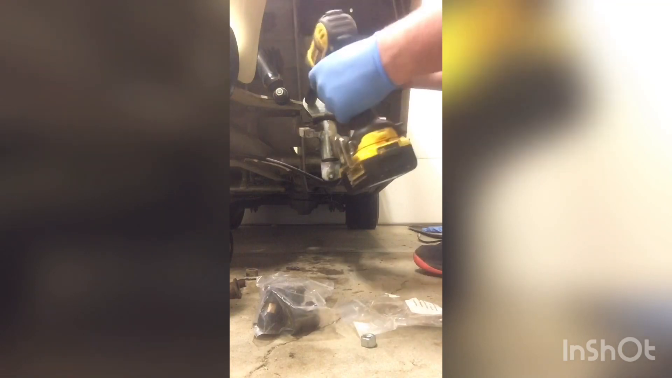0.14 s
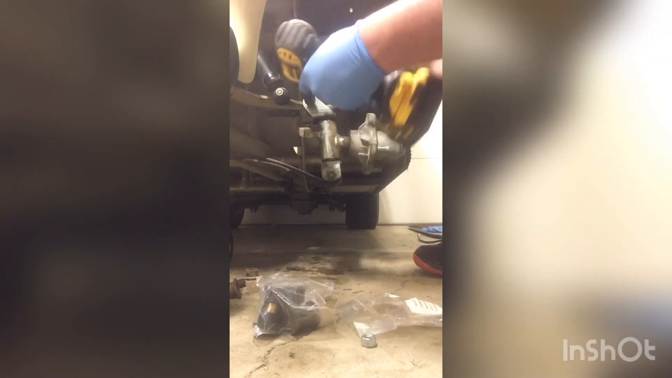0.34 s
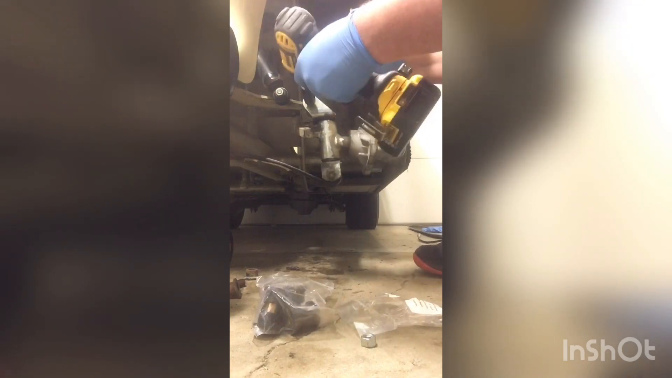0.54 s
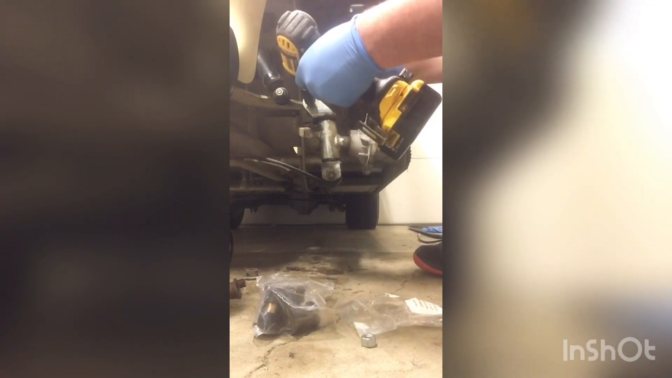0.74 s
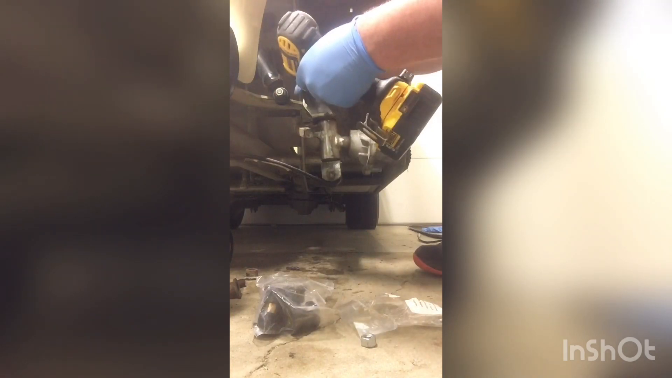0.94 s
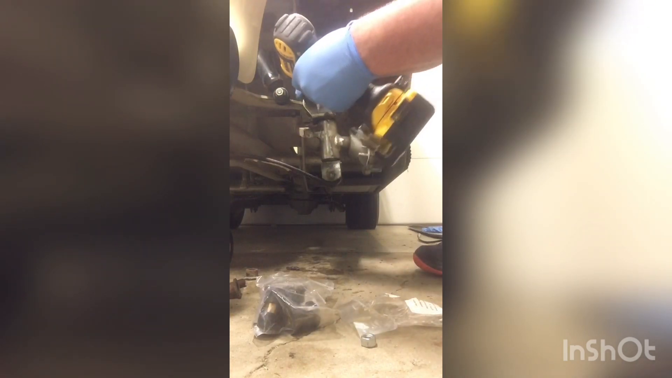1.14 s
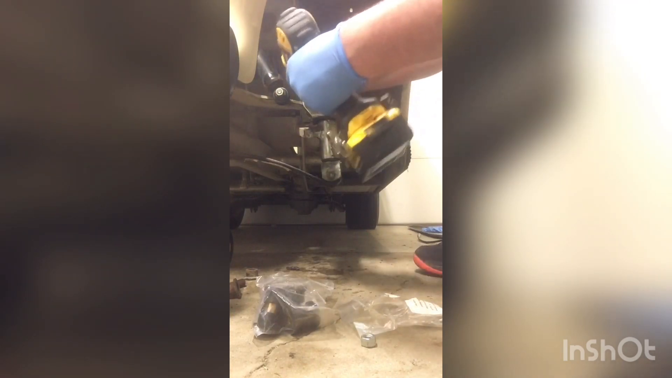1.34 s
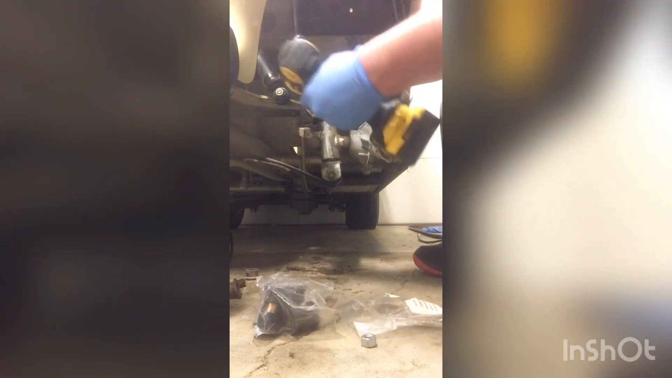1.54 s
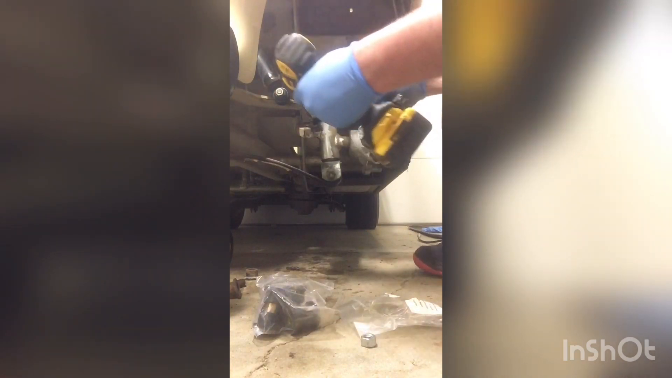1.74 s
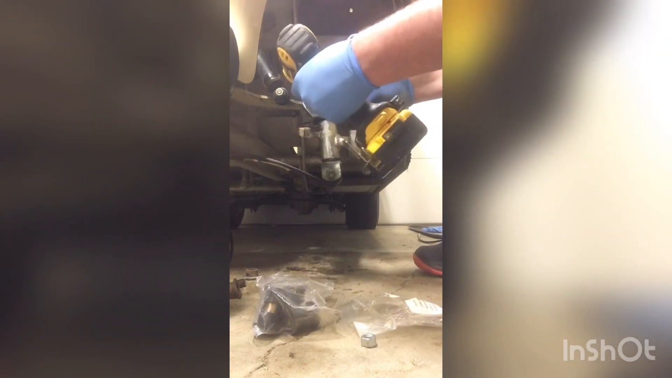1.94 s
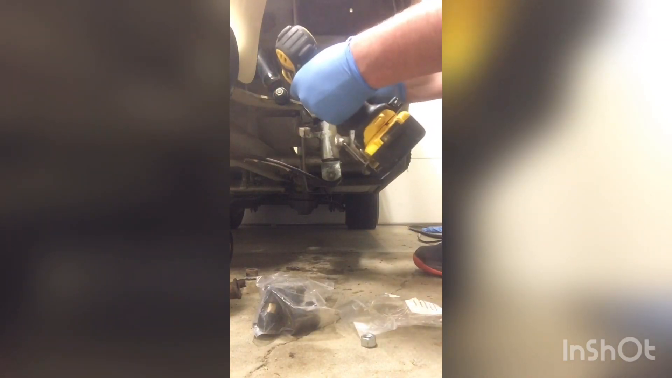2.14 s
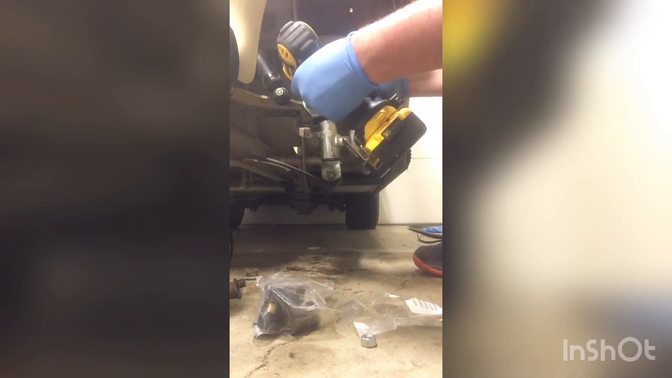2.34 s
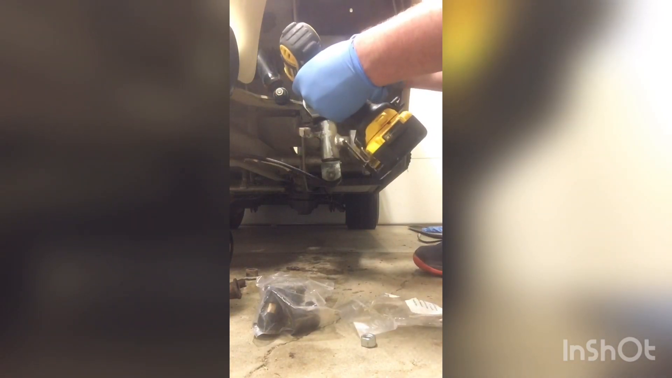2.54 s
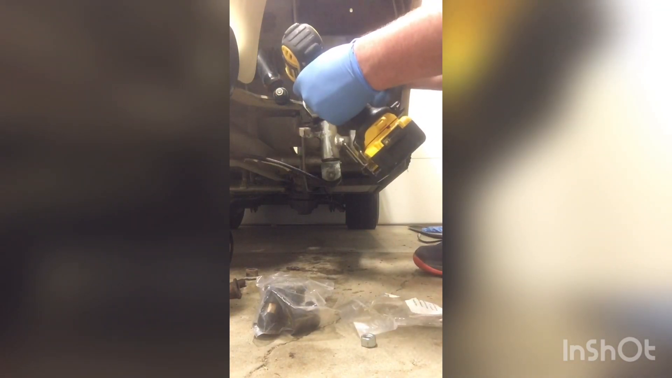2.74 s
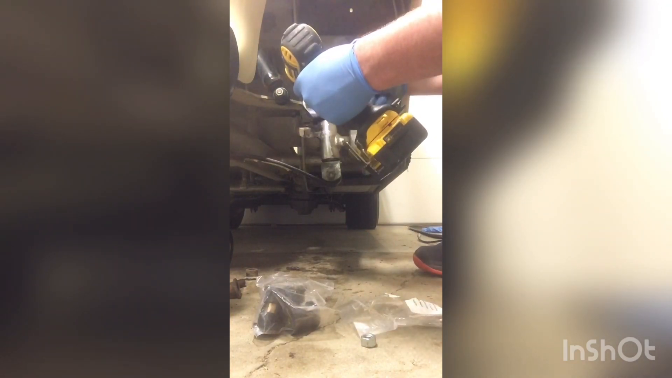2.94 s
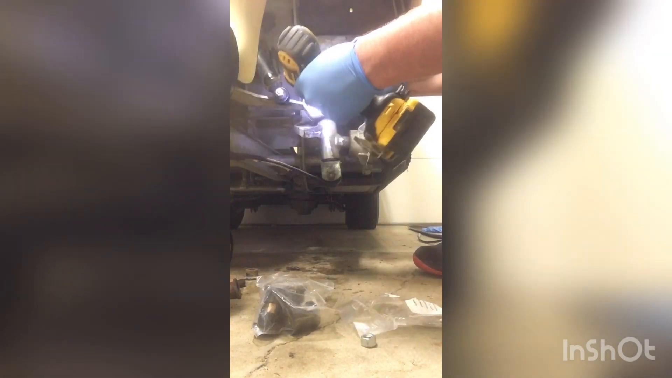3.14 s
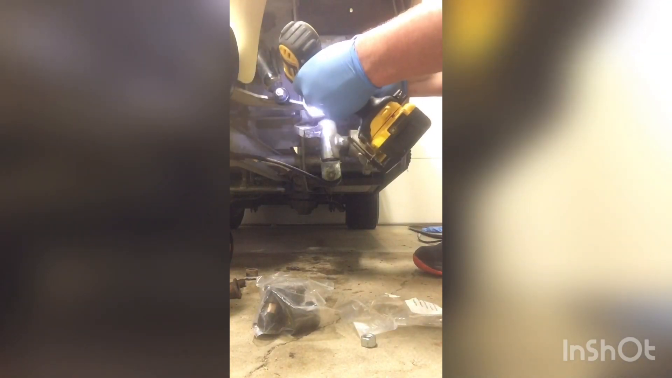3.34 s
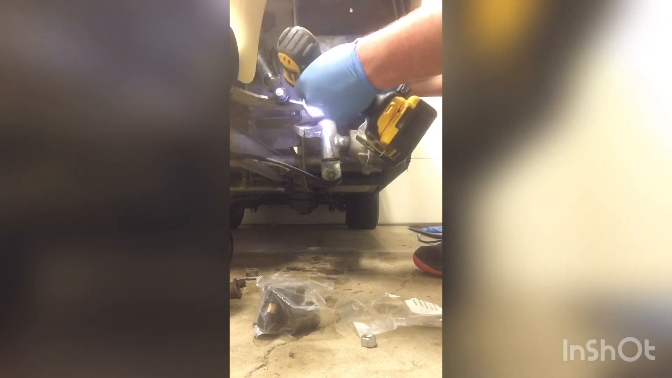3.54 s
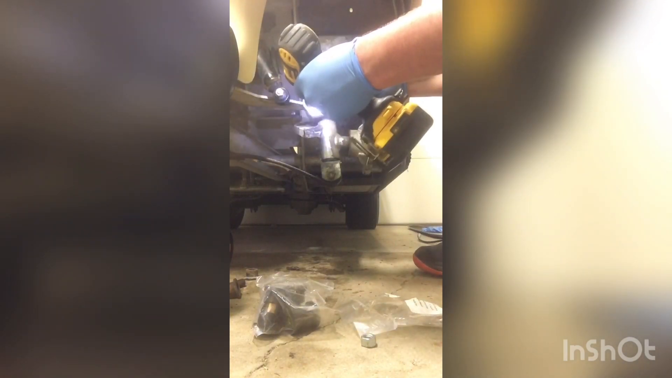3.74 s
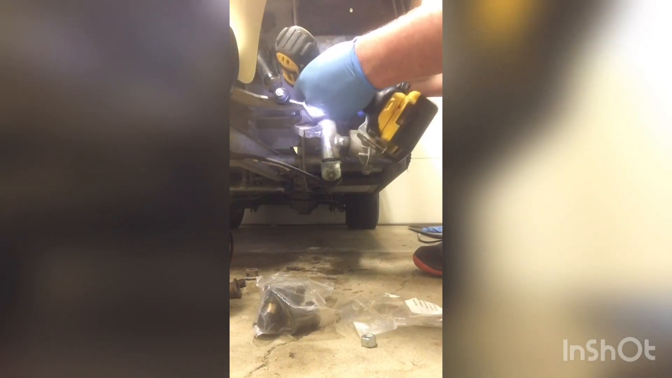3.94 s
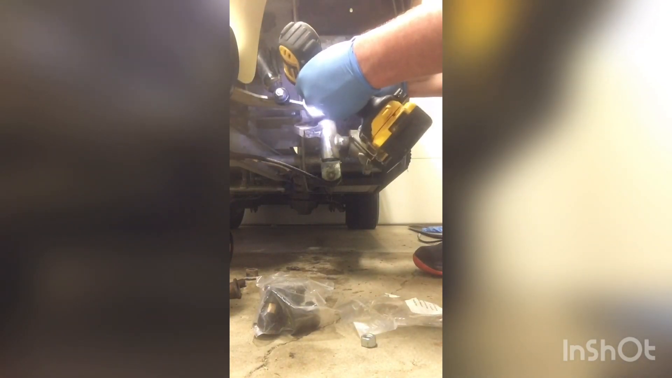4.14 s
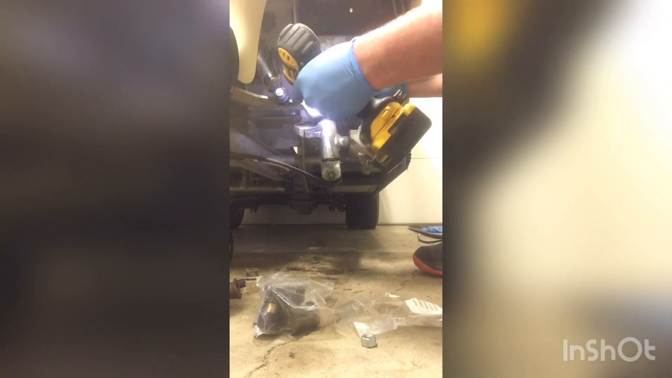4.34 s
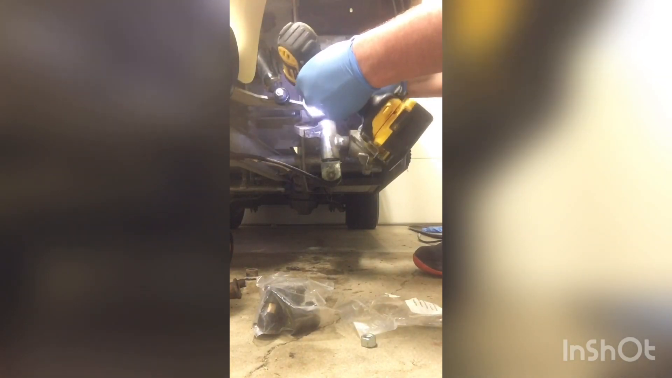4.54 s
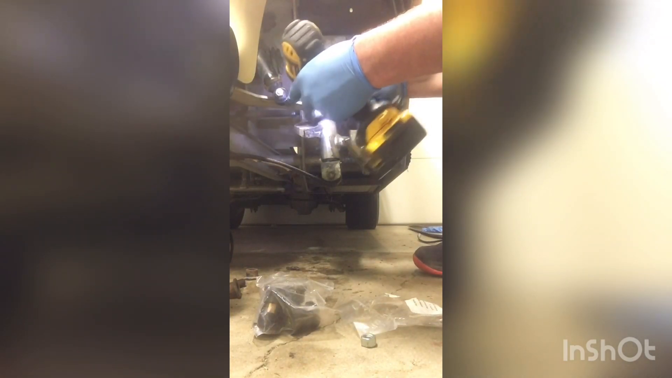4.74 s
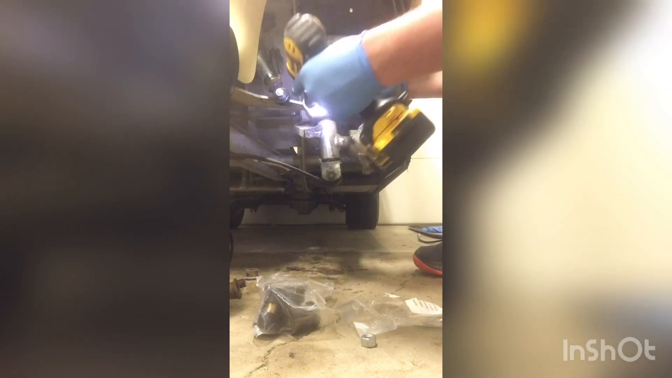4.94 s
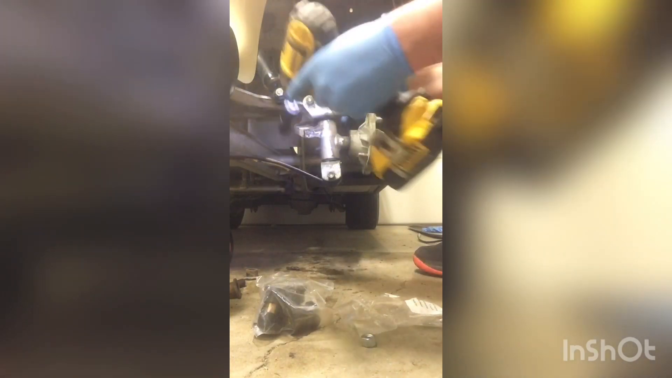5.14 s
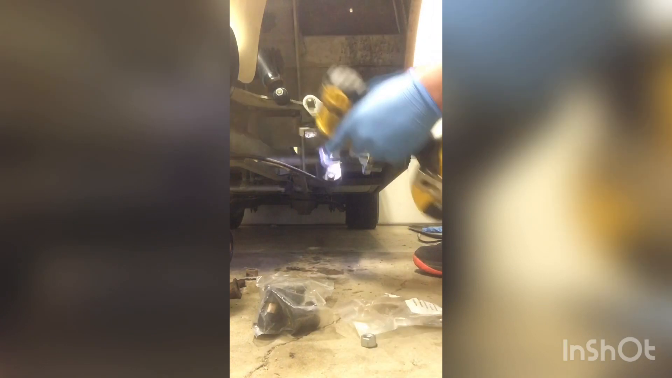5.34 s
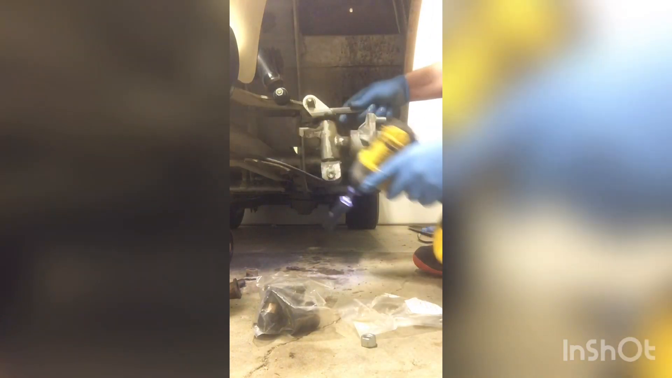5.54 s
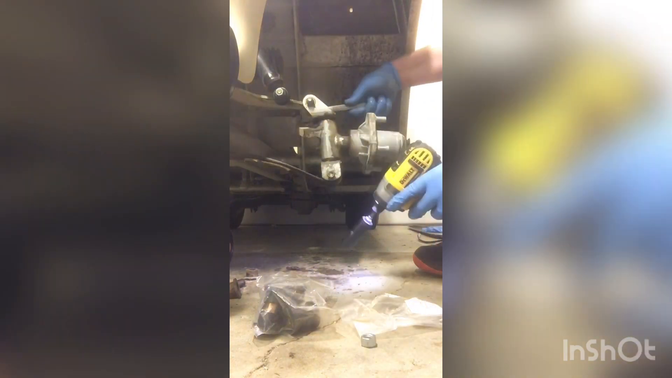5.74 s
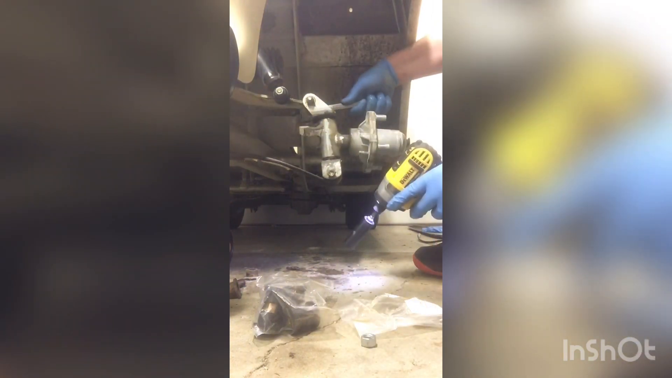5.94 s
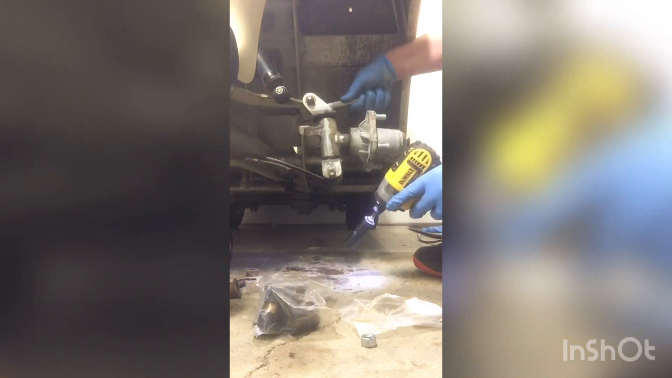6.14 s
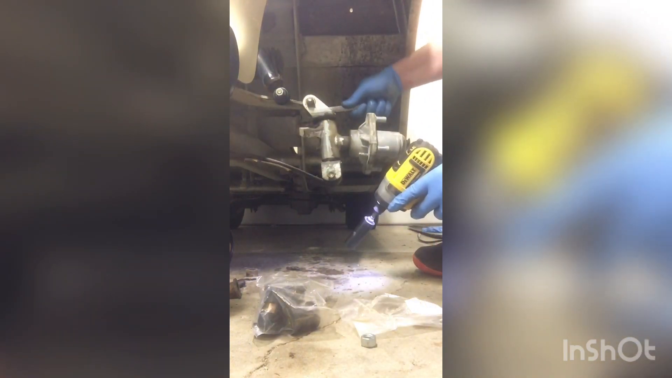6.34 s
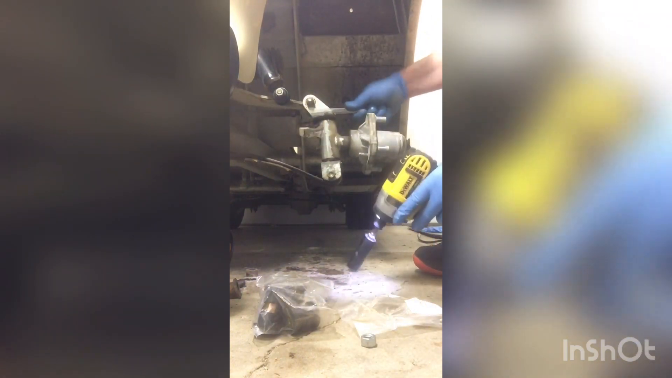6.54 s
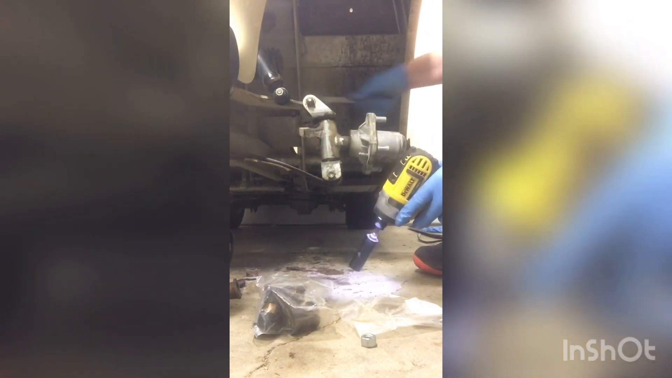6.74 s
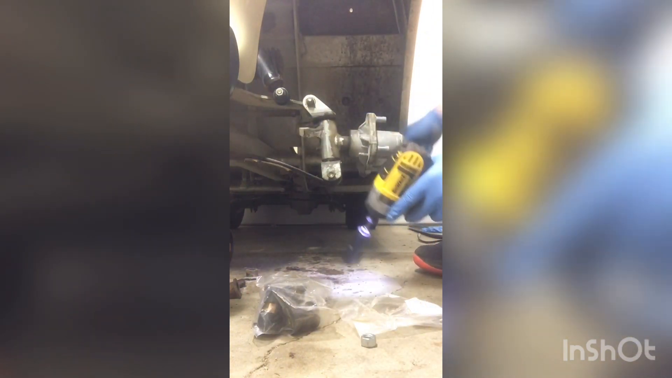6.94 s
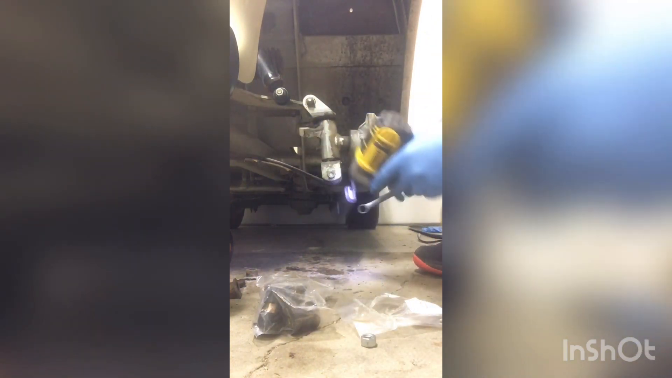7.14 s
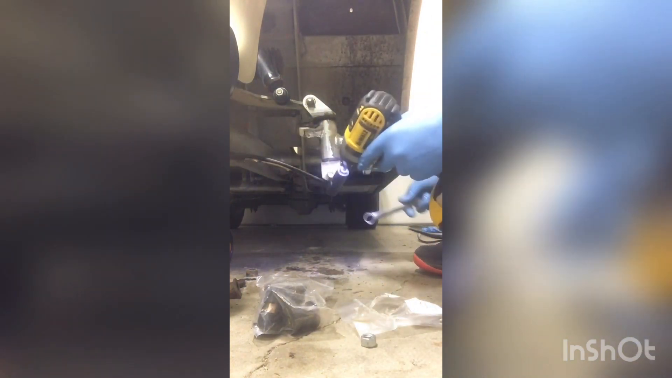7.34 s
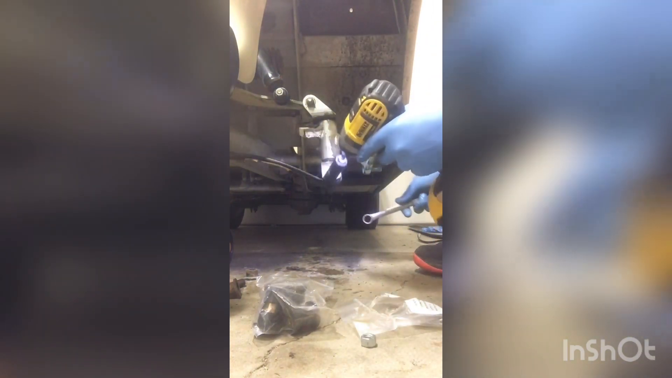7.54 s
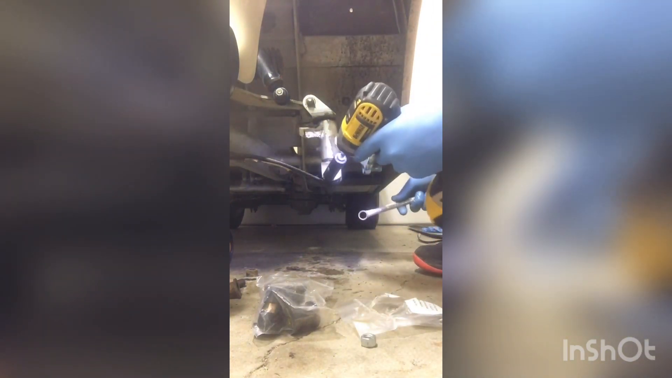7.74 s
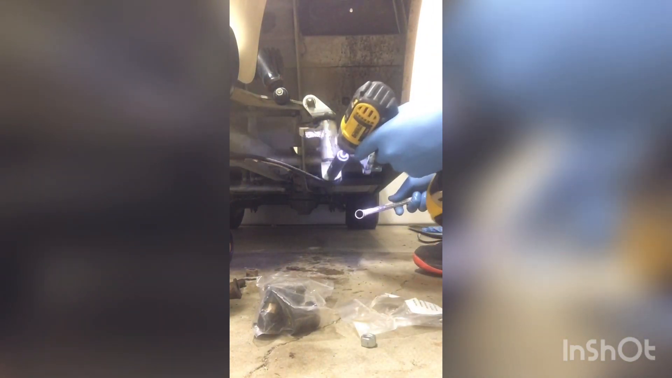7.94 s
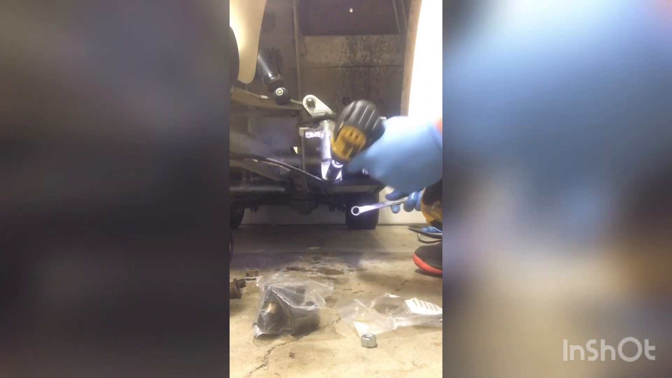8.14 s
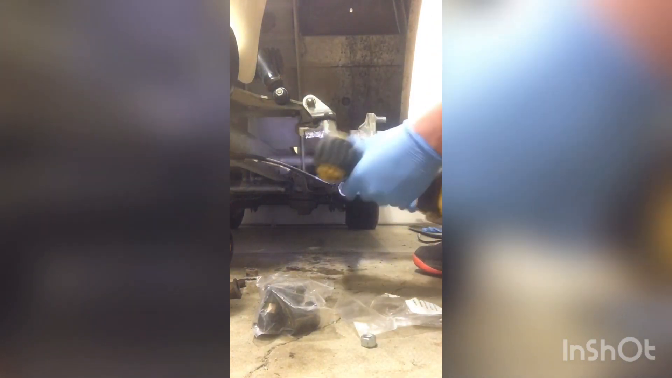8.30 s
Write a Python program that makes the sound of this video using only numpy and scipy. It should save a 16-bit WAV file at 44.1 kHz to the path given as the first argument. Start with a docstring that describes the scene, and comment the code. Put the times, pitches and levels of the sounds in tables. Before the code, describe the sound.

Metal tools clink on steel, then an impact driver whirs and fires five harsh, rapid hammering bursts; sparse clinks and glove rustle follow.

```python
"""Concrete garage: a cordless impact driver tightens a nut on a steel trailer coupling in five short bursts.
Blows are noise bursts through steel resonances; gears rattle as grainy noise, with a rough whine at first.
Mostly before and after, socket and wrench clink on the steel and ring; gloves and sleeves rustle.
Garage echo, mains hum and a faint hiss lie around the work; the microphone input rounds off the peaks."""
import sys
import numpy as np
from scipy import signal
from scipy.fft import rfft, irfft, next_fast_len
from scipy.io import wavfile
from scipy.ndimage import map_coordinates

SR = 44100
rng = np.random.default_rng(int(sys.argv[2]) if len(sys.argv) > 2 else 0)


def to_wav(s):
    """Save 16-bit WAV."""
    ch = np.atleast_2d(s).T  # columns
    pcm = np.round(np.clip(ch, -1, 1) * 32767)  # PCM
    wavfile.write(sys.argv[1], SR, pcm.astype(np.int16))


N = 373515

# trigger pulls: trigger_s, kick_db, slack_s, first_blow_s, first_gap_ms, running_gap_ms,
# settle (share of the extra gap left at each next blow), last_gap_ms, blow_db, motor_db, coast_s
TRIGGER_PULLS = [(2.9819, -12, 3.0035, 3.0864, 26.5, 19.5, .8, 22.2, 0.25, -18, .012),
                 (3.4533, -18, 3.48, 3.4880, 21.7, 16.4, .35, 20, 1.08, -16.5, .012),
                 (3.8243, -20, 3.8502, 3.8570, 20, 17.4, .2, 23, -0.5, -17, .03),
                 (4.1548, -21, 4.1798, 4.1872, 20, 17.6, .35, 16, -0.5, -17.5, .008),
                 (4.527, -8.5, 4.5404, 4.5534, 15.9, 18.9, .3, 12, -0.66, -15.5, .08)]
# blows in each pull: count
BLOW_COUNTS = (7, 10, 8, 6, 6)


def amp(db):
    """Gain of a level in dB."""
    return 10 ** (np.asarray(db) / 20)


def unit(x):
    """x at rms 1."""
    return x / np.sqrt(np.mean(x ** 2) + 1e-20)


def along(points, hz):
    """Values of (Hz, value) points, interpolated on a log frequency axis."""
    point_hz, values = np.transpose(points)
    return np.interp(np.log(hz + 1), np.log(point_hz + 1), values)


def level(tables):
    """Gain per sample summed over (s, dB) envelopes, silent outside each."""
    t = np.arange(N) / SR
    return sum(amp(np.interp(t, *np.transpose(rows), left=-200, right=-200)) for rows in tables)


def filtered(x, response):
    """x times a complex response of frequency, along the last axis."""
    m = next_fast_len(x.shape[-1] + SR // 4)
    spectrum = rfft(x, m) * response(np.fft.rfftfreq(m, 1 / SR))
    return irfft(spectrum, m)[..., :x.shape[-1]]


def unit_power(response):
    """A response that keeps the rms of white noise."""
    return response / np.sqrt(np.mean(abs(response) ** 2, axis=-1, keepdims=True))


def peak(f, centre_hz, width_hz):
    """Causal bandpass response of one damped resonance."""
    return 1j * f * width_hz / (centre_hz ** 2 - f * f + 1j * f * width_hz)


def body(modes):
    """Response of (centre_hz, width_hz, db) resonances of alternating sign, at mean power 1."""
    return lambda f: unit_power(sum((-1) ** k * amp(db) * peak(f, centre_hz, width_hz)
                                    for k, (centre_hz, width_hz, db) in enumerate(modes)))


def placed(s, rows):
    """Rows of sound added at their times."""
    at = np.round(s * SR).astype(int)[:, None] + np.arange(rows.shape[1])
    return np.bincount(at.ravel(), rows.ravel(), N + SR)[:N]


def bursts(s, db, t60, rise=0.00046, snap_db=-40):
    """Dying noise from each contact: a snap, then chatter that builds up more slowly in heavy parts."""
    t = np.arange(SR // 5) / SR
    chatter = amp(-60 * t / np.clip(t60, .004, .2)[:, None]) * (1 - np.exp(-t / rise))
    snap = amp(snap_db - 60 * t / 0.0087)
    noise = rng.standard_normal((len(s), len(t)))
    return placed(s, noise * amp(db)[:, None] * (chatter + snap))


def sputter(rate_hz, depth_db):
    """Grainy noise: a smooth curve through rate_hz random levels a second sets its gain."""
    points = rng.standard_normal(int(N * rate_hz / SR) + 4)
    jumps = map_coordinates(points, [np.arange(N) * rate_hz / SR])
    return unit(amp(depth_db * jumps) * rng.standard_normal(N))


def blow_times(pull, count):
    """The hammer settles from first to running gap; its pace changes as the trigger is let go."""
    first_s, gap_ms, run_ms, settle, last_ms = pull[3:8]
    running_ms = run_ms + (gap_ms - run_ms) * settle ** np.arange(count - 2)
    gaps_ms = np.append(running_ms, last_ms)
    return first_s + np.append(0, np.cumsum(gaps_ms)) / 1000


def strikes():
    """Trigger kick, slack taken up, blows, coasting rattle: rows s, level_db, treble_db, t60_s, scattered."""
    kick_treble_db, blow_treble_db, loose_treble_db = -24.5, -15, -21
    kick_t60_s, blow_t60_s, rattle_t60_s = 0.0092, 0.056, 0.036
    take_up_db, late_db_per_ms = -1.5, 1.05  # against a full blow; a late last blow is weaker
    rattle_gap_s, rattle_db, rattle_fade_db_per_s = .0085, -5, 91
    rows = []
    for pull, count in zip(TRIGGER_PULLS, BLOW_COUNTS):
        on_s, kick_db, slack_s, _, _, run_ms, _, last_ms, db, _, coast_s = pull
        blows_s = blow_times(pull, count)
        end_s = blows_s[-1]
        last_db = db - late_db_per_ms * max(last_ms - run_ms, 0)
        rows.append((on_s, kick_db, kick_treble_db, kick_t60_s))
        rows.append((slack_s, db + take_up_db, loose_treble_db, blow_t60_s))
        rows += [(at_s, db, blow_treble_db, blow_t60_s) for at_s in blows_s[:-1]]
        rows.append((end_s, last_db, loose_treble_db, blow_t60_s))
        # loose hammer while the motor coasts
        for after_s in np.arange(3 * rattle_gap_s, coast_s + .01, rattle_gap_s):
            fading_db = db + rattle_db - rattle_fade_db_per_s * after_s
            rows.append((end_s + after_s, fading_db, loose_treble_db, rattle_t60_s))
    s, db, treble_db, t60 = np.transpose(rows)
    chance = rng.standard_normal((80, 4))[:len(s)].T
    return (s + .0004 * chance[0], db + 1.5 * chance[1],
            treble_db + 3 * chance[2], t60 * amp(1.8 * chance[3]))


def hammer():
    """Each blow and its rebound shake the housing; the anvil cracks, coupling and chassis follow."""
    s, db, treble_db, t60 = strikes()
    rebound = bursts(s + 0.0051, db - 15.5, .5 * t60, rise=0.00051)
    housing = bursts(s, db - 9.5, 0.91 * t60, snap_db=-1.5) + rebound
    anvil = bursts(s, db + treble_db - 6.5, 1.4 * t60, snap_db=2.0)
    coupling = bursts(s, db - 15, 1.564 * t60, rise=.006)
    chassis = bursts(s, db - 27, 0.76 * t60, rise=0.0065)
    return np.array([housing, anvil, coupling, chassis])


def motor():
    """One (s, dB) envelope a pull: spin up, run free, labour under the blows, coast, stop."""
    start_db, free_db, coast_db, coast_end_db, stop_db = -14, -5, -11, -15, -32  # against motor_db
    spin_up_s, load_s, let_go_s, stop_s = .015, 0.0089, .018, .035
    tables = []
    for pull, count in zip(TRIGGER_PULLS, BLOW_COUNTS):
        on_s, (db, coast_s) = pull[0], pull[-2:]
        first_s, *_, off_s = blow_times(pull, count)
        spun_s = min(on_s + spin_up_s, first_s - load_s - .001)
        coasting_s = off_s + let_go_s
        tables.append([(on_s, db + start_db), (spun_s, db + free_db - 3.0),
                       (first_s - load_s, db + free_db), (first_s, db), (off_s, db - 2.0),
                       (coasting_s, db + coast_db), (coasting_s + coast_s, db + coast_end_db),
                       (coasting_s + coast_s + stop_s, db + stop_db)])
    return tables


def gears():
    """Gear teeth rattle in the housing, and weakly in the rest of the steel."""
    teeth = sputter(400, depth_db=3)
    return level(motor()) * teeth * amp([[0.1], [-17], [-10], [-22]])  # housing, anvil, coupling, chassis


def whine():
    """In the first pull the unloaded tooth mesh whines roughly and climbs, until the first blow."""
    # harmonics of the mesh: multiple, level_db
    mesh_orders = [(1, -11.5), (2, -0.5), (3, -4), (4, -7.5)]
    start_hz, top_hz, climb_s = 520, 1920, .045
    mesh_db, rise_s, fall_s, rough_rad = -21.5, .036, 0.0097, .33
    on_s, load_s = TRIGGER_PULLS[0][0], TRIGGER_PULLS[0][3]

    def wander():
        """Smooth random curve through a new value every 140 samples."""
        return map_coordinates(rng.standard_normal(N // 100), [np.arange(N) / 140])

    since_s = np.clip(np.arange(N) / SR - on_s, 0, None)
    hz = top_hz - (top_hz - start_hz) * np.exp(-since_s / climb_s)
    phase = 2 * np.pi * np.cumsum(hz) / SR + rough_rad * wander()
    swell = [(on_s, mesh_db - 30.5), (on_s + rise_s, mesh_db),
             (load_s - fall_s, mesh_db), (load_s, mesh_db - 29.5)]
    tones = sum(amp(order_db + 5.5 * wander()) * np.sin(k * phase) for k, order_db in mesh_orders)
    return level([swell]) * tones


def steelwork(shakes):
    """Shakes of housing, anvil, coupling and chassis, each heard through its own resonances."""
    # driver housing: centre_hz, width_hz, level_db
    housing_modes = [(1800, 1000, -7.5), (2540, 470, 1), (2985, 300, 2.5), (3360, 450, 0), (4174, 390, 3),
                     (4593, 360, 3), (5080, 590, -3.5), (6094, 910, -9)]
    # anvil: centre_hz, width_hz, level_db
    anvil_modes = [(7066, 870, 1), (8570, 1600, -6), (9550, 890, -7.5), (11230, 640, -7.5),
                   (13900, 5800, -9.5)]
    # trailer coupling: centre_hz, width_hz, level_db
    coupling_modes = [(294, 170, -3.5), (410, 98, 2), (582, 170, -0.5), (812, 60, 5), (998, 71, 2),
                      (1202.5, 75, 5), (1490, 460, -6)]
    # trailer chassis: centre_hz, width_hz, level_db
    chassis_modes = [(81, 30, 0.5), (125, 46, 1), (220.6, 42, -3.5)]
    parts = (housing_modes, anvil_modes, coupling_modes, chassis_modes)
    return filtered(shakes, lambda f: np.array([body(modes)(f) for modes in parts])).sum(axis=0)


def swishes(t):
    """Gain of the moving hands: each swish swells and fades, 6 dB down at its ends."""
    # glove and sleeve swishes: middle_s, length_s, level_db
    swish_rows = [(0, .24, -55.5), (.29, .09, -58), (.6, .17, -56.5), (.745, .07, -60), (.85, .2, -65),
                  (1.24, .14, -53), (1.4, .1, -56.5), (1.468, .022, -40), (1.95, .3, -61),
                  (2.55, .45, -61.5), (2.95, .08, -61), (5.08, .15, -54.5), (5.33, .45, -59),
                  (5.68, .3, -64), (6.36, .06, -66.5), (6.46, .2, -66), (7.77, .07, -61), (8.1, .1, -51),
                  (8.29, .2, -51), (8.47, .12, -65)]
    return sum(amp(db - 24 * ((t - s) / length_s) ** 2) for s, length_s, db in swish_rows)


def contacts():
    """The listed clinks, and faint ones at random where the hands move."""
    # socket, wrench and tool on steel:
    # start_s, level_db, pitch_hz, treble_db, knock_hz, knock_db, thud_db
    clink_rows = [(0.0802, -42, 2080, -32, 334, -8.5, -6), (0.115, -45.5, 2740, -27, 810, 3, -0.5),
                  (0.377, -44, 2430, -35, 920, 1, -21), (0.4344, -46.5, 2760, -31, 870, -15, -33),
                  (0.9042, -9, 4230, -20, 1470, -31.5, -58), (0.9115, -16, 2450, -28, 1500, -30, -55),
                  (1.1418, -43, 3030, -29, 813, -12, -32), (1.2437, -33.5, 3150, -41, 864, -8, -19),
                  (1.256, -35.5, 2040, -33, 423, -4.5, -10), (1.4154, -45, 2050, -28, 1120, -8, -22),
                  (1.4746, -7, 2460, -17.5, 1270, -14.5, -20), (1.5044, -21.5, 2010, -37, 560, -9.5, -7),
                  (1.923, -12.5, 4340, -31, 790, -18, -37), (2.243, -46.5, 4340, -9, 305, -34, -18.5),
                  (2.2692, -46, 3370, -25, 770, -15, -22), (2.3397, -41.5, 2110, -33, 802, -13, -23),
                  (2.4168, -23, 3210, -24.5, 598, -11.5, -31),
                  (2.4852, -12.5, 3300, -14.5, 813, -15.5, -36), (2.9287, -39, 3023, -19.5, 310, -38, -23),
                  (3.0192, -10, 5000, -22, 900, -21, -36), (3.2192, -5.5, 4300, -30, 900, -20, -21),
                  (5.0837, -41.5, 4527, -27, 949.3, -3, -17), (5.169, -31.5, 2940, -35.5, 780, -2, -26),
                  (5.209, -37, 1996, -31, 770, -2.8, -15), (5.3684, -43.5, 3665, -29, 417, -23.5, -26.5),
                  (5.4164, -18, 2990, -23, 774, -15, -40), (5.6276, -46, 5320, -13, 301, -26, -5),
                  (5.658, -19.5, 2080, -32, 1145, -9.5, -21), (5.7106, -21, 1810, -32, 868, -13, -28),
                  (5.728, -26, 2190, -15, 1502, -24, -27), (5.7592, -33.5, 1830, -34, 437, -13.5, -16),
                  (5.893, -42.5, 2596, -32, 302, -10, -9), (6.3703, -49, 3200, -9, 318.5, -18, -19.5),
                  (6.5826, -31.5, 3760, -39.5, 860, -3.5, -36),
                  (7.2488, -13.5, 2640, -23.5, 290, -14, -30.5), (7.6259, -40.5, 2920, -34, 990, 4.5, -7),
                  (7.776, -42.5, 3550, -15, 306, -15, -12), (7.7985, -46, 2720, -21, 300, -19, -7.5),
                  (7.9789, -22, 2780, -42, 417, -11.5, -22), (8.0346, -39, 2440, -23, 361, -7, -4),
                  (8.0602, -35.5, 2590, -32, 1210, -4.5, -3), (8.105, -25, 3120, -17.5, 350, -6, -8.5),
                  (8.2167, -40, 3310, -21, 920, -9, -18.5), (8.305, -24.5, 3230, -30, 367, -7.5, -16),
                  (8.3565, -43, 3240, -34, 334, -3.5, 0.5), (8.4025, -38, 4540, -19, 301, -25, -14),
                  (8.431, -35.5, 2630, -33, 404, -12, -22)]
    # typical faint touch: level_db, pitch_hz, treble_db, knock_hz, knock_db, thud_db
    faint_touch = (-48.5, 3403, -16.5, 333, -18.5, -16)
    faint_count, t60_s = 8, 0.058
    t = np.arange(0, N / SR, .01)
    busy = np.cumsum(np.clip(swishes(t), 1e-6, amp(-66)))
    chance = rng.uniform(size=(faint_count, 4))
    # times spread evenly over the amount of hand movement
    s = np.interp((np.arange(faint_count) + chance[:, 0]) / faint_count * busy[-1], busy, t)
    faint = np.c_[s, np.tile(faint_touch, (faint_count, 1))]
    faint[:, 1] += 8 * (chance[:, 1] - .5)  # level
    faint[:, [2, 4]] *= amp(6 * (chance[:, 2:] - .5))  # both pitches
    rows = np.r_[clink_rows, faint]
    return np.c_[rows, np.full(len(rows), t60_s)].T


def knocks(touches):
    """What a clink passes on to housing, anvil, coupling and chassis."""
    s, db, _, treble_db, _, knock_db, thud_db, t60 = touches
    housing = bursts(s, db - 16.5, t60, snap_db=3)
    anvil = bursts(s, db + treble_db - 3.5, 0.28 * t60, snap_db=-2.5)
    coupling = bursts(s, db + knock_db + 0.5, 1.9 * t60, rise=0.0055)
    chassis = bursts(s, db + thud_db + 5, 1.9 * t60, rise=.008)
    return np.array([housing, anvil, coupling, chassis])


def clinks(touches):
    """A contact chatters around its own pitch, and the spot that is hit knocks at a lower one."""
    s, db, hz, _, knock_hz, knock_db, _, t60 = touches[..., None]
    t = np.arange(SR // 6) / SR
    noise = rng.standard_normal((len(s), 2, len(t)))
    chatter = noise[:, 0] * amp(db - 9 - 60 * t / np.clip(t60, .004, .2))
    knock_fade = amp(db + knock_db - 60 * t / np.clip(1.25 * t60, .004, .15))
    knock = noise[:, 1] * knock_fade * (1 - np.exp(-t / 0.002))
    bright = filtered(chatter, lambda f: unit_power(peak(f, hz, 990) / (1 + (f / 5500) ** 4)))
    low = filtered(knock, lambda f: unit_power(peak(f, knock_hz, 180) ** 2))
    return placed(s[:, 0], bright + low)


def ringing(blows, modes):
    """Decaying sine modes, at new strengths for every blow."""
    s, db = np.transpose(blows)
    t = np.arange(SR // 2) / SR
    tones = np.array([amp(mode_db - 60 * t / t60_s) * np.sin(2 * np.pi * hz * t)
                      for hz, mode_db, t60_s in modes])
    scatter_db = 2.5 * rng.standard_normal((len(s), len(modes)))
    return placed(s, amp(db[:, None] + scatter_db) @ tones)


def free_tools():
    """Wrench and socket, struck while free, ring in their own modes."""
    # wrench blows: start_s, level_db
    wrench_blows = [(.9038, -32), (6.5819, -58)]
    # wrench modes: pitch_hz, level_db, t60_s
    wrench_modes = [(2622, -3, .17), (3241, -12, .22), (4005, -1, .33), (4506, -8, .25), (4683, -9, .3),
                    (4942, 0, .22), (5152, -12, .25), (6020, -26, .2), (8200, -26, .26), (9830, -18, .22),
                    (11960, -32, .2), (13090, -32, .25)]
    # socket blows: start_s, level_db
    socket_blows = [(1.9225, -39), (2.4846, -42.5), (5.4155, -47.5)]
    # socket modes: pitch_hz, level_db, t60_s
    socket_modes = [(2830, -4, 0.26), (3260, 2.5, 0.13), (3840, -5, .25), (4710, -6, 0.31),
                    (5080, -2.5, 0.24), (5890, -12, 0.15), (8250, -11, .2), (12080, -19, 0.16)]
    return ringing(wrench_blows, wrench_modes) + ringing(socket_blows, socket_modes)


def rustle():
    """Rubber and cloth rub in uneven grains."""
    # rubbing spectrum: freq_hz, relative density_db (per Hz)
    cloth_points = [(88, -37), (150, 2.5), (278, -12), (371, 1), (714, -16), (1050, -17), (1870, -13.5),
                    (3210, -8), (15000, -43)]
    rub = sputter(90, depth_db=2.5)
    return swishes(np.arange(N) / SR) * unit(filtered(rub, lambda f: amp(along(cloth_points, f))))


def garage(x):
    """The walls answer as decaying noise; each frequency dies at its own speed."""
    # reverberation: freq_hz, t60_s
    t60_points = [(100, 1), (700, 0.66), (2000, 0.65), (5000, 0.54), (9000, 0.52), (14000, 0.22)]
    hz, t, z = signal.stft(rng.standard_normal(SR), SR, nperseg=256)
    fade = amp(-60 * t / along(t60_points, hz)[:, None])
    tail = signal.istft(z * fade, SR, nperseg=256)[1]
    delayed = np.pad(x, (300, 0))  # samples
    return signal.fftconvolve(delayed, tail / np.linalg.norm(tail))[:N]


def background():
    """Mains hum with its overtones over a steady hiss."""
    # hum partials: pitch_hz, rms level_db
    hum_partials = [(59.2, -56.5), (177.6, -69), (242.2, -78.5), (301.5, -72), (360.7, -82), (419.9, -79)]
    # hiss spectrum: freq_hz, relative density_db (per Hz)
    hiss_points = [(53, -30), (90, -10), (109, -21), (180, -13), (224, -17), (419, -20), (488, -28),
                   (661, -25), (2000, -31), (3300, -30), (6000, -38), (10400, -49), (12900, -42),
                   (16000, -48)]
    hiss_db = -66.5
    t = np.arange(N) / SR
    hum = sum(np.sqrt(2) * amp(db) * np.sin(2 * np.pi * hz * t + rng.uniform(0, 2 * np.pi))
              for hz, db in hum_partials)
    hiss = unit(filtered(rng.standard_normal(N), lambda f: amp(along(hiss_points, f))))
    return hum + amp(hiss_db) * hiss


def scene():
    """The work in front, the room around it."""
    touches = contacts()
    tools = clinks(touches) + free_tools()
    work = steelwork(hammer() + gears() + knocks(touches)) + whine() + tools
    return (work + amp(-14.5) * garage(work) + rustle() + background())[None]


def record(dry):
    """The microphone input rounds off the highest peaks and keeps nothing above its band limit."""
    top_hz = 16100
    rounded = dry / (1 + abs(dry / .91) ** 8) ** (1 / 8)
    return filtered(rounded, lambda f: np.clip((top_hz - f) / 300, 0, 1) ** 2)


dry = scene()
out = record(dry)
to_wav(out)
```